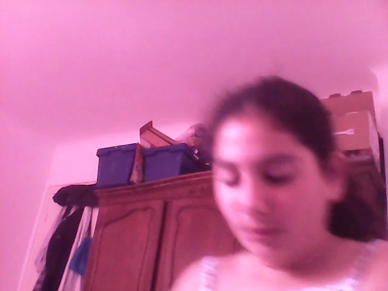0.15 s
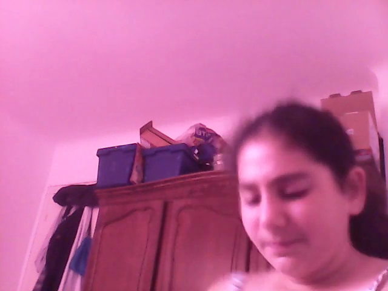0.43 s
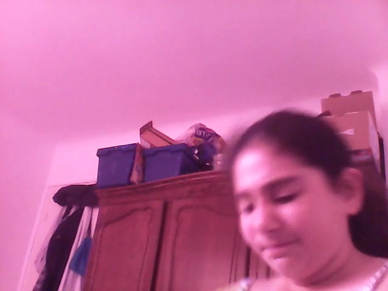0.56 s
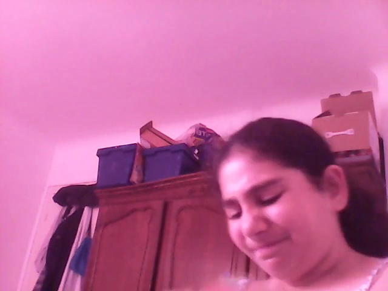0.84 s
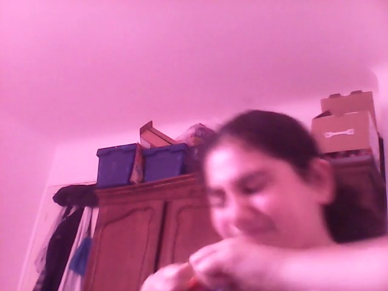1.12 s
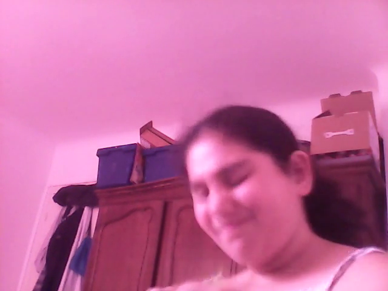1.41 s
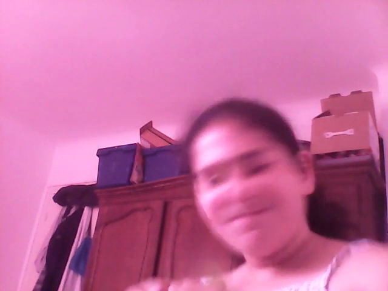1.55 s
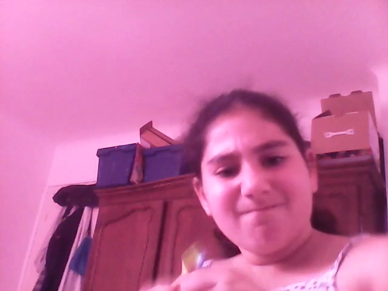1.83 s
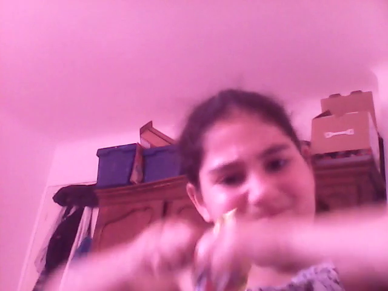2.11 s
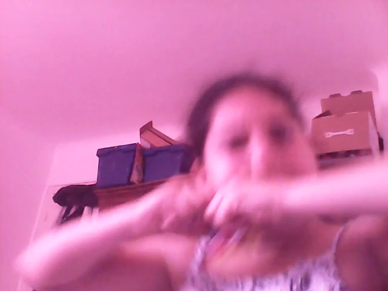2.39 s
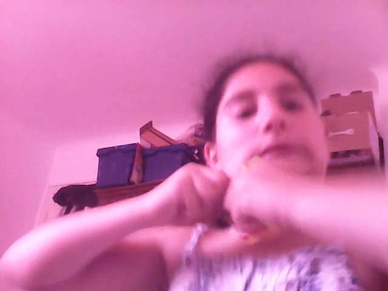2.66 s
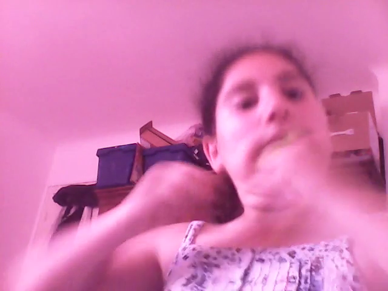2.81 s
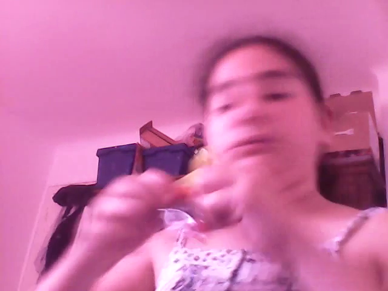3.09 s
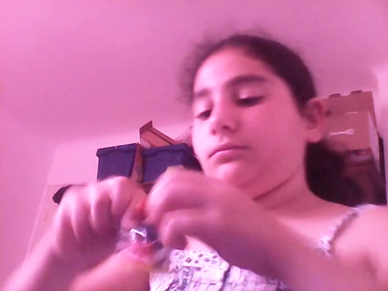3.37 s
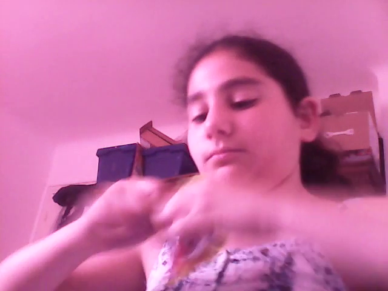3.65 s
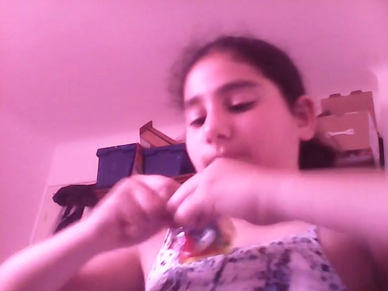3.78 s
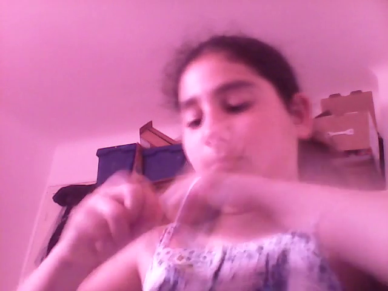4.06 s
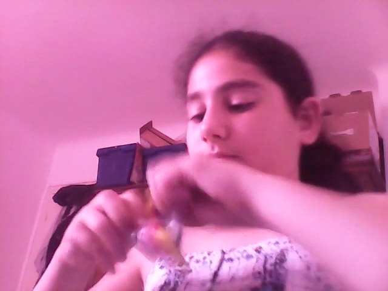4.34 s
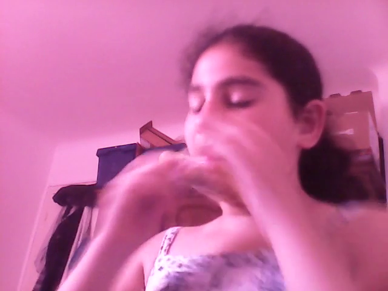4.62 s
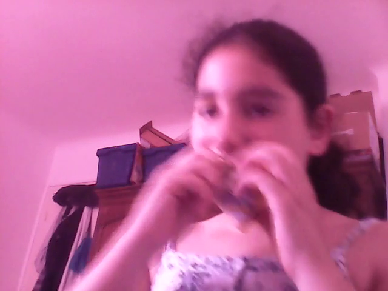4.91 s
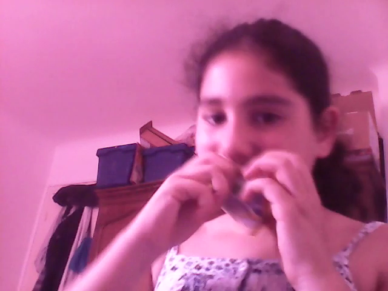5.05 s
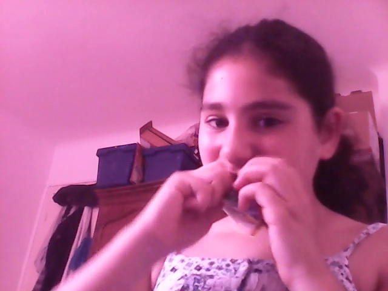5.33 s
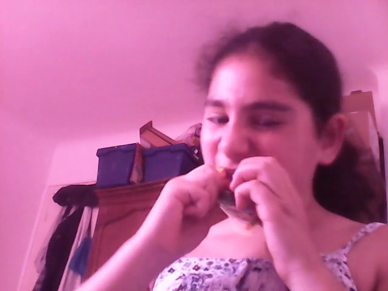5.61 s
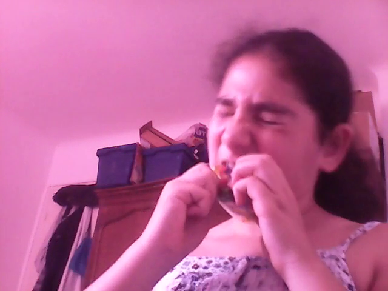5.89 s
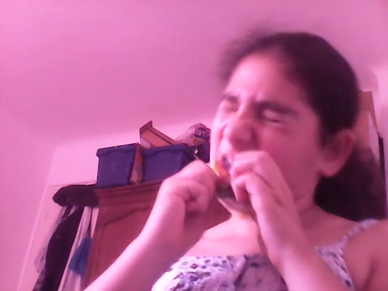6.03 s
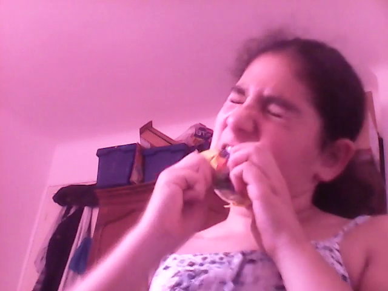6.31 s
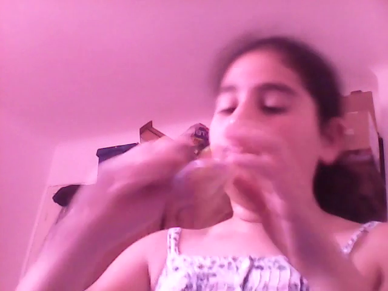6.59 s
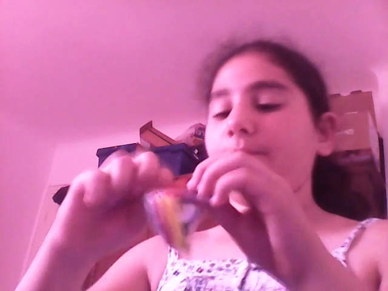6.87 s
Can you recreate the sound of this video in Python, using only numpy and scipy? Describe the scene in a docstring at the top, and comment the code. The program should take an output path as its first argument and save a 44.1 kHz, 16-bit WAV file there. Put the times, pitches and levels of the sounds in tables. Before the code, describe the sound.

A small, stiff plastic sachet is worked by hand very close to a small built-in microphone. Crisp snaps and dense little crackles come in irregular bursts, busiest in the first two seconds, then in shorter tugs with gaps. A soft low arm bump on the desk comes near three seconds. Later, while it is bitten, the crinkle is thinner and quieter. Short room tail, faint hiss and rumble.

```python
"""Plastic sachet at close range

A small plastic sachet is pulled, twisted and bitten close to a little built-in microphone in a furnished room.
Creases snap over one by one and in dense crackles: bursts of noisy slips ring resonators, the film's patches.
The desk sends back one quick echo, the room a short tail of decaying noise; an arm bumps low desk modes.
Filtered noise makes the rumble and hiss underneath, a sine the thin electronic whine."""
import sys
import numpy as np
from scipy import signal
from scipy.fft import rfft, irfft
from scipy.io import wavfile

SR = 44100
rng = np.random.default_rng(int(sys.argv[2]) if len(sys.argv) > 2 else 0)


def boost_factor(decibels):
    """Convert a level in decibels to a linear amplitude factor."""
    exponent = np.asarray(decibels, float) / 20
    return 10 ** exponent


def log_audio(samples):
    """Write samples as a 16-bit WAV file to the path given in sys.argv[1]."""
    # one column per channel
    frames = np.atleast_2d(samples).T
    # limit to full scale, then quantise
    limited = np.clip(frames, -1, 1)
    pcm = np.round(limited * 32767).astype(np.int16)
    wavfile.write(sys.argv[1], SR, pcm)


N = 306380   # length in samples

# How the grip shapes the film's sound; a tighter grip leaves smaller free patches:
# [t/s, low body level/dB, bright edge level/dB, sparkle level/dB]
GRIP_TONE = [(0, 12.5, 7.5, 2), (2.1, -7.5, 0, 1.5), (2.9, 4.5, -1, 3), (4.2, -5.5, -3.5, 4.5),
             (5.4, -1.5, -6.5, -2), (5.7, -51, -17, -1), (6.7, 10.5, 4.5, 2.5)]


def rms_one(x):
    """Scale to unit rms."""
    return x / np.sqrt(np.mean(x ** 2) + 1e-20)


def ring(clicks, hz, t60):
    """Two-pole resonator: a unit click starts a wave of height 1, with no steady push left over."""
    radius = boost_factor(-60 / (t60 * SR))
    turn = 2 * np.pi * hz / SR
    poles = [1, -2 * radius * np.cos(turn), radius * radius]
    return signal.lfilter([1, -1], poles, clicks + 1e-18) * np.cos(turn / 2)


def coloured(x, points):
    """Causal minimum-phase filter that follows a table of [f/Hz, gain level/dB]."""
    hz, level_db = np.transpose(points)
    grid_hz = np.linspace(1, SR / 2, 4097)
    log_gain = np.log(boost_factor(np.interp(np.log(grid_hz), np.log(hz), level_db)))
    # folding the cepstrum onto positive times makes the filter causal
    cepstrum = irfft(log_gain)
    cepstrum[1:4096] *= 2
    cepstrum[4097:] = 0
    response = irfft(np.exp(rfft(cepstrum)))
    return signal.fftconvolve(x, response)[:N]


def creases(shape_db, sparkle_db, spread_db, slip_ms, draws):
    """One sound a row: a crease lets go in quick slips that ring the film's patches, each a few cycles."""
    patch_hz = np.geomspace(280, 15000, 20)
    t_ms = np.arange(512) / SR * 1000
    rough = draws[:, :512] * np.sqrt(np.abs(draws[:, :512]))
    slips = rough * np.exp(-t_ms / slip_ms) * (1 - np.exp(-t_ms / 0.47))
    out = 0
    for k, hz in enumerate(patch_hz):
        colour_db = shape_db(hz) + spread_db * draws[:, 512 + k]
        # some creases sparkle more than others
        colour_db = colour_db + (hz > 8000) * (sparkle_db + 3.97 * draws[:, 532])
        # before colouring, patches of all sizes carry the same power per Hz
        gain = (-1) ** k * boost_factor(colour_db)[:, None] * hz / 2000
        out = out + gain * ring(slips, hz, 4.66 / hz)
    # every row gets the same energy in the middle of the spectrum
    middle = signal.butter(2, [500, 7000], "band", fs=SR, output="sos")
    heard = signal.sosfilt(middle, out)
    return out / np.sqrt(np.sum(heard ** 2, axis=1))[:, None]


def lay_down(at_s, sounds):
    """Add each row into the scene at its time."""
    out = np.zeros(N + SR)
    samples = (at_s * SR).astype(int)[:, None] + np.arange(512)
    np.add.at(out, samples, sounds)
    return out[:N]


def sparkle_at(at_s):
    """Top treble that the grip lets out, dB."""
    s, *_, sparkle_db = np.transpose(GRIP_TONE)
    return np.interp(at_s, s, sparkle_db)


def snaps(slip_ms):
    """Big creases, each centred on the pitch of the patch that lets go; also their smoother sound all round."""
    # creases snapping over: [t/s, level before the microphone's colour/dB, main patch f/Hz]
    big_creases = [(0.066, -22, 1280), (0.111, -20, 3200), (0.135, -22.5, 4530), (0.161, -18, 5400),
                   (0.224, -16.5, 5200), (0.246, -15, 1430), (0.278, -17, 4450), (0.386, -29.5, 4500),
                   (0.429, -19, 3170), (0.444, -23, 4670), (0.474, -24, 2730), (0.488, -19, 4500),
                   (0.569, -27, 2340), (0.591, -15.5, 5100), (0.607, -17, 950), (0.675, -23.5, 1610),
                   (0.696, -29, 577), (0.759, -26, 4670), (0.799, -26, 960), (0.824, -29.5, 1500),
                   (0.851, -21.5, 4500), (0.861, -19, 2030), (0.908, -23, 920), (0.957, -17, 4530),
                   (0.962, -23, 4260), (1.029, -41, 4960), (1.044, -25.5, 2800), (1.063, -22.5, 2970),
                   (1.09, -21, 5000), (1.125, -26.5, 1580), (1.187, -31, 1740), (1.211, -30, 2920),
                   (1.254, -22.5, 4900), (1.264, -19, 5560), (1.313, -20, 4840), (1.322, -18, 2030),
                   (1.57, -27.5, 1490), (1.601, -20, 1190), (1.626, -26, 980), (1.672, -23.5, 2140),
                   (1.683, -25, 1410), (1.743, -30.5, 1490), (1.786, -16, 2110), (1.812, -18.5, 1440),
                   (1.844, -28, 1600), (1.889, -27.5, 600), (1.919, -15, 684), (1.939, -15.5, 4800),
                   (2.001, -19.5, 1990), (2.067, -23, 4630), (2.081, -25.5, 1370), (2.117, -28.5, 3100),
                   (2.263, -22, 3140), (2.276, -24.5, 4800), (2.324, -18, 2120), (2.366, -18, 3600),
                   (2.371, -23.5, 2110), (2.492, -25.5, 4120), (2.552, -21, 980), (2.571, -28.5, 1550),
                   (2.623, -16.5, 5330), (2.738, -26.5, 1130), (2.775, -23, 3560), (2.787, -19.5, 4720),
                   (2.817, -27, 1670), (2.854, -25.5, 1030), (2.866, -32, 1480), (2.896, -22.5, 1000),
                   (2.904, -21, 1000), (3.021, -26.5, 1810), (3.132, -26.5, 1540), (3.203, -24, 4050),
                   (3.271, -28.5, 3860), (3.432, -23.5, 770), (3.469, -23, 1650), (3.539, -27.5, 615),
                   (3.572, -19, 5260), (3.633, -27, 596), (3.667, -20.5, 4340), (3.685, -15.5, 6140),
                   (3.805, -21.5, 3580), (3.83, -23.5, 2460), (3.838, -19, 1000), (3.847, -29, 980),
                   (3.907, -23.5, 6440), (3.981, -28.5, 2070), (4.002, -26.5, 1430), (4.347, -36, 1490),
                   (4.386, -27.5, 4600), (4.514, -23, 4050), (4.58, -19.5, 6200), (4.646, -25.5, 530),
                   (4.722, -24, 5940), (4.816, -37, 2160), (4.945, -18.5, 1920), (4.986, -21, 1000),
                   (5.038, -30.5, 1590), (5.13, -26, 1500), (5.137, -31, 1460), (5.183, -32, 4850),
                   (5.19, -33.5, 1550), (5.259, -28, 3400), (5.285, -31.5, 1570), (5.348, -20.5, 2770),
                   (5.369, -36, 2220), (5.401, -31, 1580), (5.423, -27.5, 2920), (5.448, -29.5, 1700),
                   (5.458, -30, 1540), (5.479, -34, 1780), (5.616, -31, 3100), (5.657, -28.5, 5130),
                   (5.794, -31, 1770), (5.82, -25, 4360), (5.901, -31.5, 1610), (5.986, -31.5, 2260),
                   (6.151, -18.5, 1450), (6.167, -30, 1550), (6.174, -24, 1500), (6.188, -21, 1700),
                   (6.206, -24, 4700), (6.331, -32, 1740), (6.415, -32, 3850), (6.573, -26, 1130),
                   (6.599, -36, 1530), (6.623, -21, 1530), (6.655, -25, 1520), (6.755, -35.5, 580),
                   (6.772, -32.5, 4920), (6.801, -32, 3430)]
    # a snap weakens away from the pitch of its main patch
    below_db_per_octave, above_db_per_octave = 11, 6.5
    s, level_db, main_hz = np.transpose(big_creases)
    draws = rng.standard_normal((len(s), 533))

    def near_db(hz):
        octaves = np.log2(hz / main_hz)
        below = below_db_per_octave * np.minimum(octaves, 0)
        above = above_db_per_octave * np.clip(octaves, 0, 2.5)
        return below - above

    def around_db(hz):
        return 0.7 * near_db(hz)

    near = creases(near_db, sparkle_at(s) + 0.76, 1.61, slip_ms, draws)
    # summed over all directions the colour is broader and the fine peaks even out
    around = creases(around_db, sparkle_at(s), 0, 0.1, draws)
    # the power of a snap is spread over its slips
    size = boost_factor(level_db)[:, None] * np.sqrt(slip_ms * SR / 20000)
    start_s = np.maximum(s - 0.0006, 0)
    return [lay_down(start_s, sounds * size) for sounds in (near, around)]


def effort_at(at_s):
    """How hard the film is worked, dB: attack, hold and release of every gesture, powers added."""
    # pulls, twists and bites, each keeping the film busy for a while:
    # [start t/s, hold t/s, effort level/dB]
    gestures = [(0, 0.15, -50), (0.195, 0.063, -37.5), (0.447, 0.036, -41), (0.598, 0.0083, -34),
                (0.674, 0.064, -42.5), (0.84, 0.082, -49.5), (1.035, 0.035, -43), (1.241, 0.075, -47),
                (1.597, 0.03, -48), (1.684, 0.021, -47.5), (1.892, 0.094, -40.5), (2.033, 0.17, -53.5),
                (2.224, 0.25, -59), (2.478, 0.17, -56), (2.766, 0.041, -46), (2.881, 0.087, -37),
                (3.092, 0.8, -54), (3.586, 0.11, -41.5), (4.059, 0.014, -41), (4.14, 0.038, -54),
                (4.297, 0.092, -52.5), (4.518, 0.13, -49), (4.817, 0.21, -63), (5.123, 0.076, -53.5),
                (5.314, 0.11, -55), (5.565, 0.059, -58.5), (5.666, 0.053, -56), (5.972, 0.078, -54.5),
                (6.175, 0.027, -46), (6.588, 0.029, -45.5), (6.753, 0.14, -66.5)]
    tighten_db_per_s, slacken_db_per_s = 312, 208
    start, hold, level_db = np.transpose(gestures)[:, :, None]
    early = np.maximum(start - at_s, 0)
    late = np.maximum(at_s - start - hold, 0)
    power = boost_factor(level_db - tighten_db_per_s * early - slacken_db_per_s * late) ** 2
    return 10 * np.log10(power.sum(axis=0) + 1e-12)


def crackle(per_s, size_db, slip_ms, busy_db):
    """Small creases at random, uneven in size and colour; harder handling makes them louder and denser."""
    at, chance = rng.random((2, round(per_s * N / SR)))
    at = at * N / SR
    draws = rng.standard_normal((len(at), 536))
    effort_db = effort_at(at)
    # share of the creases that sound: all of them from busy_db upwards
    share = np.clip(boost_factor(0.6 * (effort_db - busy_db)), 0.28, 1)
    s, body_db, edge_db, _ = np.transpose(GRIP_TONE)
    body_db = np.interp(at, s, body_db) + 3.7 * draws[:, 533]
    edge_db = np.interp(at, s, edge_db) + 2.0 * draws[:, 534]
    size = rms_one(boost_factor(size_db * np.minimum(np.abs(draws[:, 535]), 2.7)))
    # where fewer creases sound, each is made stronger to hold the average power
    size = size * (chance < share) * boost_factor(effort_db) * np.sqrt(SR / per_s / share / 3)

    def colour_db(hz):
        octaves = np.clip(np.log2(hz / 2000), -1, 1)
        return max(-octaves, 0) * body_db + max(octaves, 0) * edge_db

    # 0.2 dB of top treble gained for each dB of effort
    sparkle_db = sparkle_at(at) + 0.2 * (effort_db - busy_db)
    sounds = creases(colour_db, sparkle_db, 3.35, slip_ms, draws)
    return lay_down(at, sounds * size[:, None])


def desk_echo(x, count=40):
    """One quick reflection off the desk, whose delay wanders as the hands move."""
    delay_s, level_db = 0.00136, -10
    wander_share = 0.08   # scales the random drift of the delay
    sample = np.arange(N)
    wander = np.interp(sample, np.linspace(0, N, count), rng.uniform(-1.1, 1, count))
    delay = delay_s * SR * (1 + wander_share * wander)
    return boost_factor(level_db) * np.interp(sample - delay, sample, x)


def room(x, count=18):
    """Diffuse tail of decaying noise; as the hands move, one pattern of echoes gives way to the next."""
    # thin walls swallow the lows, cloth the highs: [lower f/Hz, upper f/Hz]
    wall_band = [155, 10600]
    t60_s, level_db = 0.3, -9.5
    t = np.arange(SR // 3) / SR
    place = np.linspace(0, count - 1, N)
    walls = signal.butter(1, wall_band, "band", fs=SR, output="sos")
    out = 0
    for k, noise in enumerate(rng.standard_normal((count, len(t)))):
        dull = signal.sosfilt(walls, noise)
        # the tail waits 1.8 ms, then builds up over 3.6 ms
        tail = boost_factor(-60 * t / t60_s) * dull * np.clip(t / 0.0036 - 0.5, 0, 1)
        here = np.sqrt(np.maximum(1 - np.abs(place - k), 0))
        out = out + signal.oaconvolve(x * here, rms_one(tail) / np.sqrt(len(t)))[:N]
    return boost_factor(level_db) * out


def bumps():
    """An arm on the desk: a soft push sets the low desk modes going."""
    # pushes, whose pitch depends on the spot: [t/s, push level/dB, pitch ratio]
    arm_pushes = [(0.982, -46, 1), (3.022, -33.5, 1.003), (3.079, -45.5, 1.04), (4.282, -54, 1.54),
                  (4.32, -50, 1.4)]
    # desk modes: [f before the pitch ratio/Hz, level relative to the push/dB, t60/s]
    desk_modes = [(93.5, 1.5, 0.17), (64.3, -18, 0.39), (206, 1, 0.069)]
    out = 0
    for s, level_db, ratio in arm_pushes:
        push = np.zeros(N)
        start = round(s * SR)
        push[start:start + 300] = boost_factor(level_db) * np.hanning(300) / 150
        for hz, mode_db, t60 in desk_modes:
            out = out + boost_factor(mode_db) * ring(push, hz * ratio, t60)
    return out


def background():
    """Rumble and hiss as filtered noise, and the whine of the electronics as a sine."""
    # spectrum of rumble and hiss: [f/Hz, relative level per Hz/dB]
    floor_spectrum = [(36, -43), (48, 4), (60, -9.5), (90, -1), (200, -11.5), (600, -21.5), (1500, -30.5),
                      (5000, -19), (10000, -42), (13700, -36)]
    # the whine rises slowly, then sinks a step: [t/s, rms level/dB]
    whine_level = [(0.0, -77), (4.06, -71.5), (4.14, -77), (6.95, -78)]
    floor_db, whine_hz = -70, 12695.3
    hiss = boost_factor(floor_db) * rms_one(coloured(rng.standard_normal(N), floor_spectrum))
    t = np.arange(N) / SR
    whine_rms = boost_factor(np.interp(t, *np.transpose(whine_level)))
    whine = whine_rms * np.sqrt(2) * np.sin(2 * np.pi * whine_hz * t)
    return hiss + whine


def scene():
    """Film, desk echo and room as the microphone colours them, over bumps and background."""
    # film as the microphone colours it: [f/Hz, gain level/dB]
    mic_colour = [(150, -17), (400, -0.5), (600, 7), (1250, 7.5), (1520, 8.5), (2550, 5), (5000, 5.5),
                  (7000, -3.5), (9500, -24.5), (12000, -14), (14000, -14.5), (15300, -17.5)]
    near, around = snaps(slip_ms=1.6)
    small = crackle(per_s=450, size_db=7.5, slip_ms=1.9, busy_db=-42)
    film = near + small
    at_microphone = film + desk_echo(film) + room(around + small)
    return (coloured(at_microphone, mic_colour) + bumps() + background())[None]


def band_limit(x):
    """A steep low-pass at the top of the band."""
    return signal.sosfilt(signal.butter(12, 16810, fs=SR, output="sos"), x)


def record(dry):
    """The top is cut steeply by a low-pass that is 22 dB down from 15650 Hz."""
    low_pass = signal.cheby2(14, 22, 15650, fs=SR, output="sos")
    mix = signal.sosfilt(low_pass, dry)
    return band_limit(mix)


dry = scene()
out = record(dry)
log_audio(out)
```